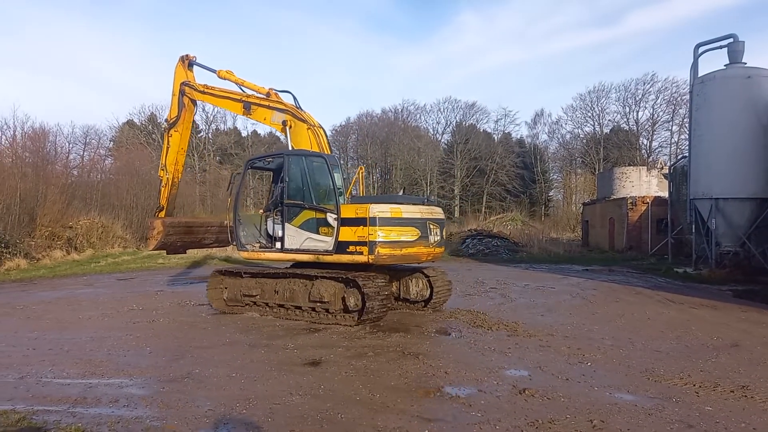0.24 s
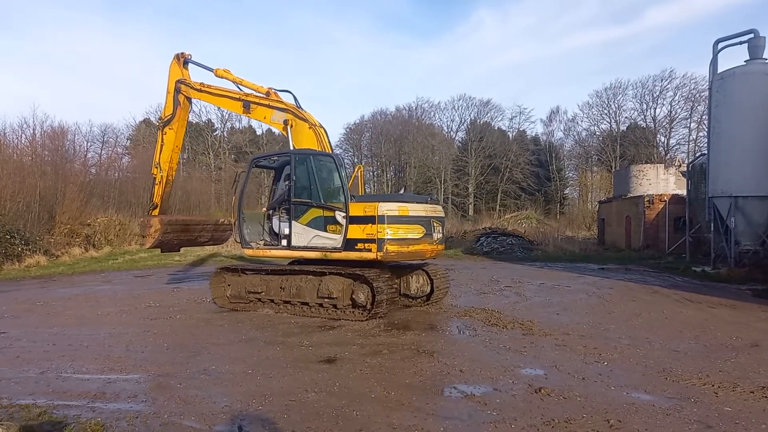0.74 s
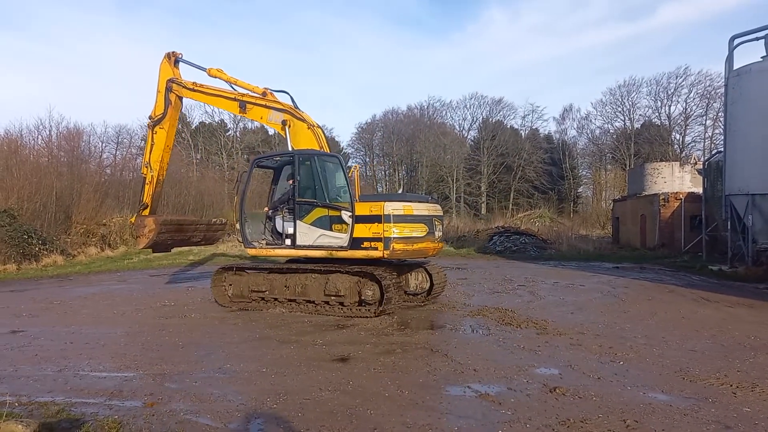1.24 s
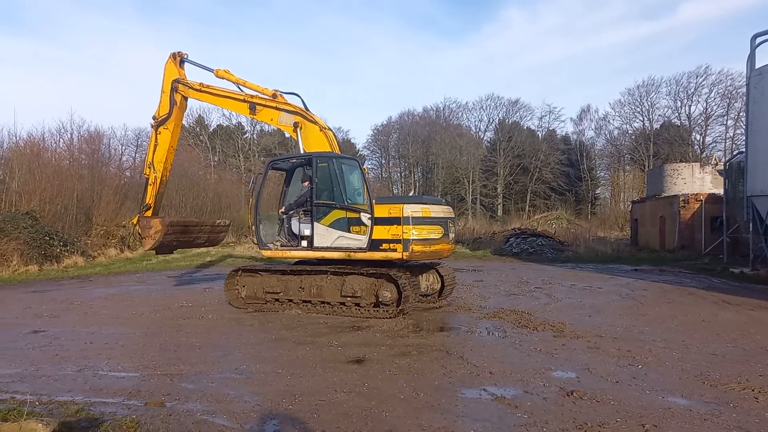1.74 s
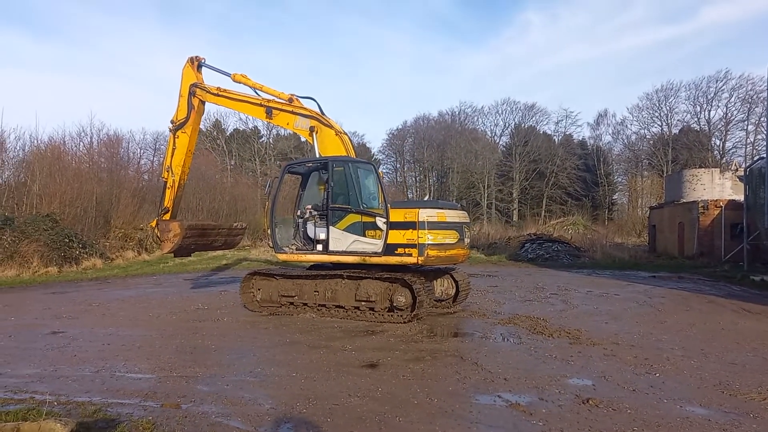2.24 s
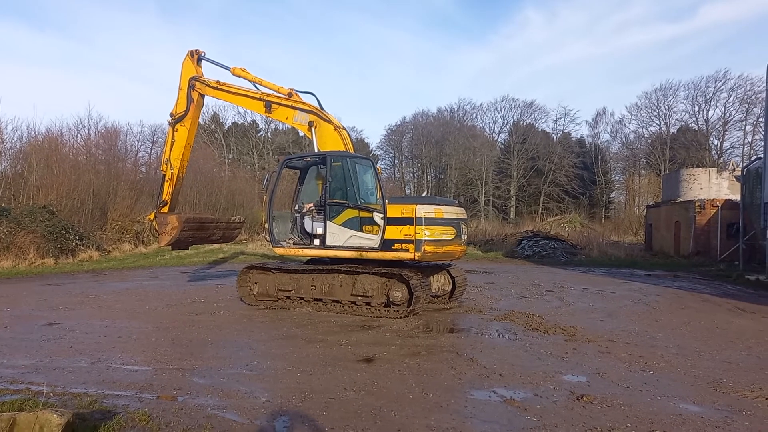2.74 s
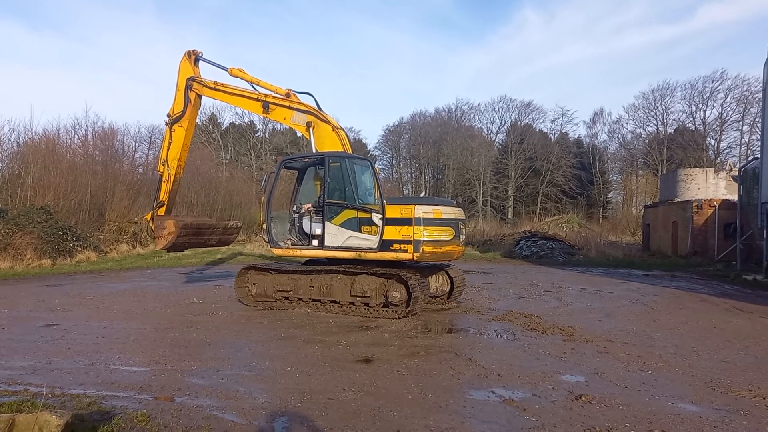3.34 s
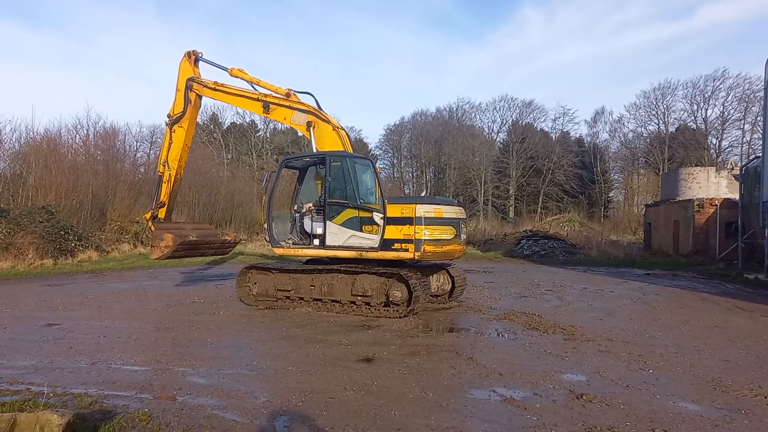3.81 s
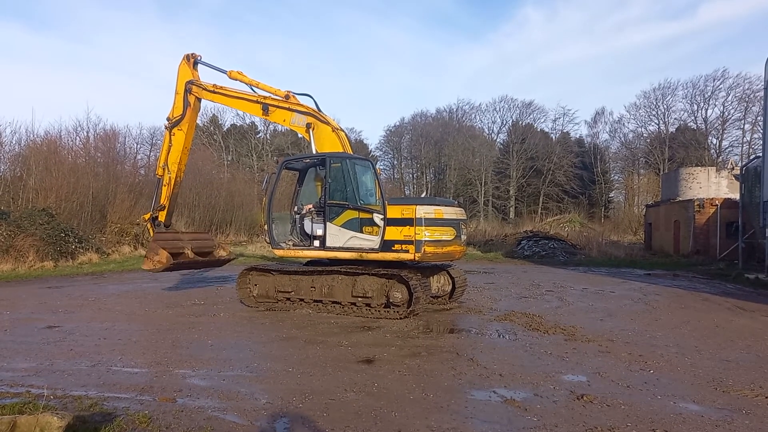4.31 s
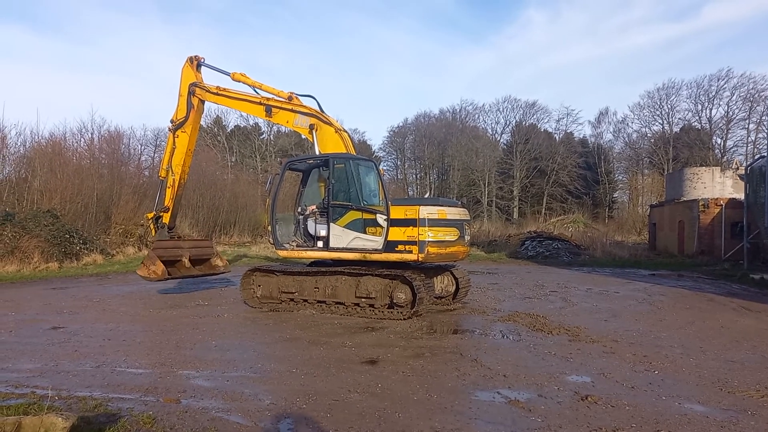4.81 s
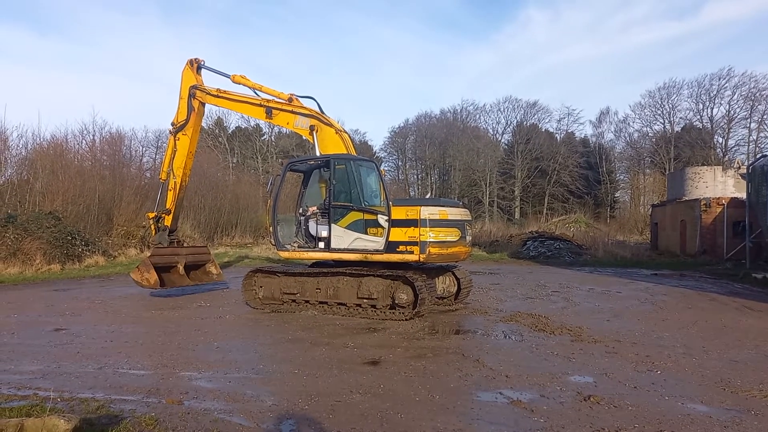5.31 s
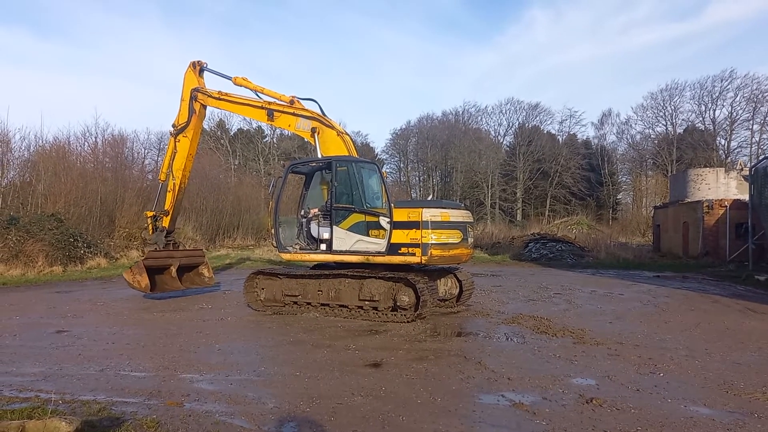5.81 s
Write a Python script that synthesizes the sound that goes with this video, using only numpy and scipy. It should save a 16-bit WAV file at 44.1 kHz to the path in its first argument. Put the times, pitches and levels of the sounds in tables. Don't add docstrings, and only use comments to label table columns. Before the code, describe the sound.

Heavy track links clatter irregularly over a low, rattling diesel drone, with squelchy spits of mud. The clatter slows and ends after about two seconds, leaving steady engine knock with a few soft thumps and metallic ticks. Midway the engine labours harder, pumps whine, and the boom groans briefly; near the end oil whistles softly in a valve. Open yard, moderate distance, compact stereo microphones.

```python
import sys
import numpy as np
from scipy import signal
from scipy.fft import rfft, irfft
from scipy.io import wavfile
from scipy.ndimage import uniform_filter1d

SR = 44100
rng = np.random.default_rng(int(sys.argv[2]) if len(sys.argv) > 2 else 0)


def transcribe(u):
    v = np.clip(np.atleast_2d(u).T, -1, 1)
    q = np.round(v * 32767).astype(np.int16)
    wavfile.write(sys.argv[1], SR, q)


def decibels_to_gain(level_db):
    exponent = np.asarray(level_db, float) / 20
    return 10 ** exponent


N = 267246
T = np.arange(N) / SR
HZ = np.arange(N // 2 + 1) * SR / N
PUMP_RAMP_S, PUMPS_EASE_S = 0.2, 5.15
STRAIN_S, STRAIN_LENGTH_S = 3.4, 0.2

# (time [s], firing rate [Hz])
FIRING_RATE = [(0.0, 68.65), (1.0, 68.35), (1.2, 68.85), (1.4, 71.2), (1.6, 72.5), (1.8, 73.4), (2.0, 73.6),
               (3.0, 73.45), (3.2, 72.3), (3.6, 70.8), (3.8, 70.4), (4.8, 70.4), (5.2, 70.05), (5.4, 69.3),
               (5.8, 69.9), (6.06, 70.05)]


def crankshaft():
    return np.cumsum(columns(FIRING_RATE)[0]) / SR


# (time [s], level [dB])
FIRING_TONE = [(0.0, -23), (1.0, -21.5), (1.24, -22), (1.53, -32), (1.66, -28.5), (1.78, -30.5),
               (1.95, -32.5), (2.45, -33.5), (3.05, -28.5), (3.3, -24.5), (3.44, -23), (3.6, -22.5),
               (3.71, -19), (3.81, -23), (5.2, -23), (5.45, -20), (5.75, -22), (6.06, -22.5)]


def firing_db():
    return columns(FIRING_TONE)[0]


def drone(fired):
    firing = tone(fired, firing_db(), wobble_db=0.5, wobble=0.084)
    return firing + exhaust_overtone(fired) + pump_whine(fired) + shaft_tones(fired)


# (time [s], change [dB], length [s])
FALTERS = [(.3, -7, 0.085), (.88, -8, 0.077), (1.3, -2, .08), (1.494, -8, 0.09), (1.83, -31, 0.065),
           (2.155, -9.5, 0.07), (2.377, -8.5, 0.1), (3.383, 2.5, 0.03), (3.72, -2, 0.058),
           (3.925, -5, 0.07), (4.968, 0.5, 0.03), (5.262, 5.5, 0.054), (5.44, -4, 0.067),
           (5.538, 4.5, 0.091), (5.825, 6, 0.031)]


def exhaust_overtone(fired):
    takes_load, eased = ramp(3.08, PUMP_RAMP_S), ramp(PUMPS_EASE_S, PUMP_RAMP_S)
    db = follow(free_db=-34, load_db=0, rolling_db=1.7) + 2.5 * np.sin(2 * np.pi * fired / 8)
    db = db + 2.5 * takes_load + 0.6 * eased
    db = db + sum(change_db * bump(s, length_s) for s, change_db, length_s in FALTERS)
    lag_turns = -0.27 + 0.14 * np.maximum(takes_load, rolling()) + 0.06 * eased
    return tone(2 * fired + lag_turns, db, wobble_db=1.7, wobble=0.3)


# (multiple of firing rate, idle level [dB], work starts [s], working [dB], eased [dB])
WHINE = [(4.5, -56, 3.1, -42, -49), (7, -47, 3.0, -46, -51), (8, -39.5, 3.4, -42, -48),
         (9, -55, 3.5, -41.5, -46)]


def pump_whine(fired):
    out = 0
    eased = ramp(PUMPS_EASE_S, PUMP_RAMP_S)
    for order, idle_db, start_s, work_db, eased_db in WHINE:
        db = idle_db + (work_db - idle_db) * ramp(start_s, PUMP_RAMP_S) + (eased_db - work_db) * eased
        db = db - 12 * rolling()
        if order == 7:
            db = db + 5.5 * bump(STRAIN_S, STRAIN_LENGTH_S)
        if order > 5:
            db = db - 8 * bump(3.69, 0.05)
        out = out + tone(order * fired + 0.16, db + 1.5, wobble_db=0.6, wobble=0.05)
    return out


# (multiple of shaft speed, level below the firing tone [dB])
SHAFT = [(3, -23.5), (5, -46), (6, -13.5), (7, -25), (8, -21), (10, -29.5), (12, -56), (19, -27.5),
         (20, -23.5)]


def shaft_tones(fired):
    body_db = 0.5 * firing_db() - 12 - 5 * rolling() - 2 * ramp(5.47, PUMP_RAMP_S)
    out = 0
    for order, db in SHAFT:
        turns = order * fired / 2 + 0.04 * rng.random() + 0.16
        out = out + tone(turns, db + body_db, wobble_db=1.5, wobble=0.3)
    return out


def knock(fired):
    count = fired.astype(int)
    cylinder_db = np.array([1.5, -0.8, 0.4, -1.2])[count % 4]
    size = decibels_to_gain(1.6 * rng.standard_normal(count[-1] + 1)[count] + cylinder_db)
    blow = size * np.exp(-((fired + 0.3) % 1) / 0.16)
    jolt_db = slaps()[2] + 1.1 * bump(STRAIN_S, 2 * STRAIN_LENGTH_S)
    lope_db = 0.5 * np.sin(2 * np.pi * fired / 4)
    flutter = decibels_to_gain(1.1 * walk(17) + 0.8 * walk(30) + lope_db)
    rattle = block(blow) + decibels_to_gain(-9) * casing(fired, size, blow)
    rattle_db = follow(free_db=-37, load_db=2.75, rolling_db=3.8) + jolt_db + 0.62
    bright = flutter * (valve_gear(blow) + injector_hiss(blow))
    return decibels_to_gain(rattle_db) * flutter ** 0.25 * rattle + decibels_to_gain(0.46 * jolt_db) * bright + gas_rush(blow)


# (frequency [Hz], level [dB per Hz])
BLOCK = [(440, -26), (750, -4.5), (801, -8), (944, 0), (1020, -4), (1080, 2), (1170, -0.5), (1290, -1),
         (1510, 0), (1900, -5), (2220, -5.5), (2810, -8), (3330, -25), (3600, -16.5), (4680, -22),
         (7920, -120)]


def block(blow):
    return colour((9.5 + blow) * rng.standard_normal(N), BLOCK) * decibels_to_gain(0.6 * walk(7))


# (frequency [Hz], width [Hz], level [dB])
CASING = [(1076, 57, -13.5), (1258, 27, -1.5), (1332, 14, -7), (1506, 27, -5.5), (1689, 48, -4),
          (2198, 92, -11), (2717, 85, -14.5)]


def casing(fired, size, blow):
    strikes = rfft(rng.standard_normal(300))
    one_firing = level(irfft(strikes / np.abs(strikes)), 0)
    pattern = np.interp((fired + 0.028 * walk(7)) % 1, np.linspace(0, 1, 300), one_firing)
    return ring(pattern * size + 0.4 * blow * rng.standard_normal(N), CASING, 3 * walk(11))


# (frequency [Hz], level [dB per Hz])
TREBLE = [(1760, -12), (3000, -2), (3320, 3.5), (3410, 1), (4080, -2.5), (4310, 0), (4910, 1.5), (5260, 1),
          (5680, -6), (6170, -5.5), (6550, -14), (7450, -7), (9000, -21), (11700, -47), (19800, -120)]


def valve_gear(blow):
    db = follow(free_db=-47.5, load_db=3.25, rolling_db=4) + 2
    return decibels_to_gain(db) * colour((1.6 + blow) * rng.standard_normal(N), TREBLE)


# (frequency [Hz], level [dB per Hz])
HISS = [(5000, -10), (8500, -2), (9080, -9), (10000, 3.5), (11100, 0), (12300, 2.5), (13600, -13),
        (14900, -9), (15600, -4)]


def injector_hiss(blow):
    sizzle = (0.32 + blow) * rng.standard_normal(N) + 0.26 * grains(300, 1.5, 0.0027)
    db = follow(free_db=-62, load_db=8.3, rolling_db=7.1) - 0.5
    return decibels_to_gain(db) * colour(sizzle, HISS) * decibels_to_gain(1.1 * walk(8.1))


# (frequency [Hz], level [dB per Hz])
RUSH = [(25, -44), (50, -14.5), (62, -11), (100, -7), (145, -9), (220, -9), (300, -12.5), (390, -17),
        (500, -13.5), (640, -11), (760, -15.5), (830, -23), (1100, -44)]


def gas_rush(blow):
    db = follow(free_db=-36.5, load_db=2.42, rolling_db=5.76) + 1
    return decibels_to_gain(db) * colour((3.9 + blow) * rng.standard_normal(N), RUSH)


# (frequency [Hz], width [Hz], level [dB])
FRAME = [(243, 31, -0.5), (259.8, 21, 0), (293.5, 64, 0), (120, 190, -12)]
# (frequency [Hz], width [Hz], level [dB])
LINKS = [(529, 77, 2), (608, 50, 3.5), (786, 93, -1), (871, 183, 0.5), (1540, 190, -4.5), (2142, 38, -5.5)]


def tracks():
    rumble_db, grind_db, _ = slaps()
    rumble = decibels_to_gain(-30.5 + 0.42 * rumble_db) * ring(grains(500, 1.4, 0.005), FRAME)
    grind = decibels_to_gain(-27.5 + 0.42 * grind_db) * ring(grains(800, 1.7, 0.0025), LINKS)
    return rumble * (1 - ramp(1.689, 0.128)) + grind * (1 - ramp(1.516, 0.256))


# (time [s], lift of rumble [dB], of grinding [dB], of block rattle [dB])
SLAPS = [(.01, 28, 7, 1), (.13, 12, -6, 2.5), (.32, 8, 13.5, -2), (.375, 4, 12, -0.5), (.435, 17, 10, -0.5),
         (.69, 1, 9, 0.5), (.77, 7, 7, -1.5), (.85, 10, -17, 1), (.99, 14, 12.5, -3), (1.085, 6, 11, -2),
         (1.15, 14.5, -5, -1.5), (1.24, 17, -3, 1.5), (1.33, 11, -2, 2.5), (1.405, -1, 2, -1.5),
         (1.442, 12, -1, 0), (1.59, 7, 7, -1.5), (1.655, 18, -6, 3), (1.72, 13, 23, -3.5)]


def slaps():
    s, *lift_db = np.transpose(SLAPS)
    return np.array(lift_db) @ bump(s[:, None], 0.034)


# (time [s], peak level [dB], ringing [Hz])
FRAME_BLOWS = [(0.057, -21, 253), (0.122, -12, 303), (0.15, -17, 253), (0.189, -12, 253),
               (0.225, -11.5, 229), (0.26, -15, 290), (0.294, -17, 233), (0.366, -10, 255),
               (0.427, -8.5, 308), (0.629, -18, 303), (0.709, -9, 287), (0.747, -13, 285),
               (0.864, -18, 237), (0.977, -26, 317), (1.052, -10.5, 278), (1.147, -16, 249),
               (1.174, -17, 247), (1.232, -11.5, 237), (1.329, -15, 290), (1.389, -10.5, 353),
               (1.431, -16, 254), (1.475, -19, 313), (1.632, -16, 269), (1.712, -21, 237)]
# (time [s], peak level [dB], ringing [Hz])
PLATE_BLOWS = [(0.021, -28, 510), (0.072, -20, 707), (0.121, -19, 607), (0.306, -10, 939),
               (0.359, -20, 740), (0.444, -10.5, 618), (0.47, -21, 765), (0.558, -12, 930),
               (0.724, -21, 802), (0.763, -13, 652), (0.829, -10, 897), (0.962, -21, 890),
               (1.082, -21, 785), (1.124, -20, 620), (1.269, -13, 704), (1.307, -12, 740),
               (1.355, -17, 707), (1.377, -10, 600), (1.429, -14, 640), (1.484, -15, 607),
               (1.516, -20, 860), (1.626, -12, 507), (1.698, -17, 574), (1.749, -14, 502)]
# (time [s], peak level [dB], ringing [Hz])
PIN_BLOWS = [(0.0157, -20, 1550), (0.0458, -11, 1564), (0.119, -10, 1555), (0.157, -12, 1550),
             (0.2225, -12, 1560), (0.3266, -20, 1680), (0.461, -11, 1290), (0.5372, -19, 1480),
             (0.623, -23, 1540), (0.669, -18, 1370), (0.7332, -17, 1440), (1.055, -22, 1490),
             (1.0786, -14, 1490), (1.1613, -23, 1700), (1.2092, -16, 1540), (1.2844, -16, 1480),
             (1.3079, -11, 1420), (1.428, -13.5, 1720), (1.5938, -12, 1544), (1.6761, -24, 1330)]


def clatter():
    frame = blows(FRAME_BLOWS, db=-11, t60_s=0.21, spread=0.147)
    plates = blows(PLATE_BLOWS, db=-6.5, t60_s=0.095, spread=0.2)
    pins = blows(PIN_BLOWS, db=-8, t60_s=0.071, spread=0.114)
    return frame + plates + pins


def blows(table, db, t60_s, spread):
    out, t = np.zeros(N + SR), T[:SR // 6]
    for s, peak_db, hz in table:
        below, above = rng.random(2)
        modes = np.sin(2 * np.pi * hz * t)
        for ratio in (1 - spread * (0.3 + below), 1 + spread * (0.34 + above)):
            modes = modes + 0.5 * np.sin(2 * np.pi * hz * ratio * t)
        place(out, s, struck(t, peak_db + db, t60_s, 0.0017) * modes)
    return out[:N]


def settling():
    out, t = np.zeros(N + SR), T[:SR // 5]
    pin_ticks(out, t)
    link_thumps(out, t)
    mud_spits(out, t)
    crack = rng.standard_normal(len(t)) * struck(t, -27, t60_s=0.016, attack_s=0.0006)
    place(out, 1.3795, signal.sosfilt(signal.butter(2, 4200, "high", fs=SR, output="sos"), crack))
    clank = struck(t, -9, t60_s=0.028, attack_s=0.002) * np.sin(2 * np.pi * 500 * t)
    place(out, 1.4293, clank)
    return out[:N]


# (time [s], peak level [dB], mid band relative to it [dB], bright band centre [Hz])
TICKS = [(.1431, -38, 4, 9000), (.5851, -32, 4, 9000), (1.3189, -37, 6, 9500), (1.3895, -40, 14, 6000),
         (1.429, -45, 18, 7000), (1.4894, -41, 14, 8000), (1.5714, -37, 0, 11500), (1.578, -34, 0, 11500),
         (1.585, -36, 2, 11500), (1.5944, -34, 6, 9500), (1.604, -32, 19, 8000), (1.8873, -39, 3, 11200),
         (1.9195, -38, 4, 10400), (2.0408, -38, 10, 7800), (2.0574, -40, 2, 10940), (2.2877, -42, 4, 9000),
         (2.3294, -46, 11, 9000), (2.6494, -52, 10, 9000), (3.698, -38, 8, 10000), (3.8556, -39, 12, 9500),
         (5.821, -40, 22, 7000), (5.829, -40, 22, 7000), (5.838, -43, 8, 10600)]


def pin_ticks(out, t):
    for s, db, mid_db, hz in TICKS:
        burst = rng.standard_normal(len(t)) * struck(t, db + 0.5, t60_s=0.026, attack_s=0.00097)
        place(out, s, band(burst, hz / 1.45, hz * 1.35) + decibels_to_gain(mid_db - 7) * band(burst, 1400, 5000))


# (time [s], peak level [dB], pitch [Hz])
THUMPS = [(1.428, -15.5, 2040), (1.75, -21, 490), (1.817, -13, 481), (1.902, -23, 150), (1.938, -17, 300),
          (2.308, -15.5, 300), (2.976, -20, 183), (3.039, -13, 285), (3.199, -19, 300), (3.31, -17, 200),
          (3.534, -18, 202), (5.398, -20, 216)]


def link_thumps(out, t):
    for s, db, hz in THUMPS:
        modes = sum(np.sin(2 * np.pi * hz * ratio * t) for ratio in (0.75, 0.88, 1.01, 1.15))
        place(out, s, struck(t, db - 6.5, t60_s=0.055, attack_s=0.005) * modes)


# (time [s], peak level [dB], pitch [Hz])
SPITS = [(.1, -34, 14300), (.143, -32, 7400), (.245, -28, 7600), (.26, -32, 7600), (.585, -34, 7600),
         (.61, -34, 7600), (.72, -38, 14900), (.94, -36, 15100), (.965, -36, 15100), (1.015, -35, 14900),
         (1.222, -36, 14900), (1.32, -36, 14300), (1.49, -35, 15100), (1.495, -30, 7600)]


def mud_spits(out, t):
    for s, db, hz in SPITS:
        burst = rng.standard_normal(len(t)) * struck(t, db, t60_s=0.08, attack_s=0.003)
        place(out, s, band(burst, hz / 1.05, hz * 1.05))


# (centre time [s], length [s], level [dB])
GROANS = [
    (3.395, .2, -38),
    (4.15, 0.08, -35),
]


def groan():
    return swells(GROANS) * ring(rng.standard_normal(N), [(182, 40, 0)])


# (centre time [s], length [s], level [dB])
VALVE = [
    (3.72, 0.23, -47),
    (5.42, .15, -44),
    (5.72, 0.21, -44),
]


def valve():
    return swells(VALVE) * ring(rng.standard_normal(N), [(2196, 41, 0)])


# (time [s], pitch [Hz], level [dB])
TURBO = [(1.9, 15600, -85), (2.15, 15050, -69), (2.6, 14750, -69), (3.0, 14450, -67), (3.3, 14700, -67),
         (3.6, 15200, -65), (3.8, 15600, -68), (4.0, 15700, -90)]


def turbo():
    hz, db = columns(TURBO)
    breath = level(uniform_filter1d(uniform_filter1d(rng.standard_normal(N), size=90), size=90), 0)
    return decibels_to_gain(db - 0.3) * breath * np.sqrt(2) * np.sin(2 * np.pi * np.cumsum(hz) / SR)


# (frequency [Hz], likeness [0-1])
ALIKE = [(80, .9997), (150, .985), (300, .93), (520, .965), (750, .9), (950, .76), (1900, .74), (2600, .6),
         (2950, .22), (4200, .45), (5000, .78), (6200, .28), (7700, .45), (9800, .3), (11500, .45),
         (13600, .15), (15300, .5)]
# (frequency [Hz], left leads [radians])
LEAD = [(20, .19), (120, .19), (500, -.1), (2240, -.35), (2900, -1.2), (3300, -2.7), (4000, -1.7),
        (4650, -.2), (6000, .3), (6400, -2.6), (7750, -.3), (8800, -.3), (10500, -2.3), (13600, -2.3),
        (15500, -1.8)]
# (frequency [Hz], left minus right [dB])
LEAN = [(60, 0), (800, 0.3), (1200, 1.5), (2600, 2), (4300, -6), (5700, -1.5), (6400, 5.5), (7300, -2.5),
        (10200, 5), (11900, -2), (13300, 1), (14650, -1), (15700, .8)]


def yard(machine):
    direct = rfft(machine)
    echoes = rfft(rng.standard_normal(N) * np.exp(-T / 0.12))
    scattered = direct * echoes / np.abs(echoes)
    alike = along(ALIKE)
    mid = np.sqrt((1 + alike) / 2) * direct
    side = np.sqrt((1 - alike) / 2) * scattered
    port = decibels_to_gain(along(LEAN) / 2) * np.exp(0.5j * along(LEAD))
    return np.array([irfft((mid + side) * port, N), irfft((mid - side) / port, N)])


def rolling():
    return 1 - ramp(1.36, 0.55)


def follow(free_db, load_db, rolling_db):
    load = np.clip((firing_db() + 33) / 6, 0, 1)
    return free_db + load_db * np.maximum(load, rolling()) + rolling_db * rolling()


def tone(turns, db, wobble_db, wobble):
    return np.sqrt(2) * decibels_to_gain(db + wobble_db * walk(14)) * np.sin(2 * np.pi * turns + wobble * walk(8.4))


def grains(rate, spread_db, smear_s):
    hits = (rng.random(N) < rate / SR) * decibels_to_gain(spread_db * rng.exponential(size=N))
    power = signal.lfilter([1], [1, -np.exp(-1 / (smear_s * SR))], hits ** 2)
    return np.sqrt(power + 1e-9) * rng.standard_normal(N)


def ring(x, modes, swell_db=0):
    out = 0
    for k, (hz, width, db) in enumerate(modes):
        b, a = signal.iirpeak(hz, hz / (1.66 * width), SR)
        rung = signal.lfilter(b, a, signal.lfilter(b, a, x))
        out = out + decibels_to_gain(db + np.roll(swell_db, k * N // len(modes))) * rung
    return level(out, 0)


def struck(t, db, t60_s, attack_s):
    return decibels_to_gain(db - 60 * t / t60_s) * np.minimum(t / attack_s, 1)


def place(out, s, sound):
    out[int(s * SR):][:len(sound)] += sound


def band(x, low_hz, high_hz):
    return signal.sosfilt(signal.butter(2, [low_hz, high_hz], "band", fs=SR, output="sos"), x)


def swells(table):
    return sum(decibels_to_gain(db) * bump(s, length_s) for s, length_s, db in table)


def bump(s, length_s):
    return np.exp(-((T - s) / length_s) ** 2)


def ramp(start_s, length_s):
    return np.clip((T - start_s) / length_s, 0, 1)


def walk(rate):
    k = int(SR / rate)
    held = np.repeat(rng.standard_normal(N // k + 1), k)
    return uniform_filter1d(uniform_filter1d(held, k), k)[:N]


def level(x, db):
    return x * decibels_to_gain(db) / np.sqrt(np.mean(x ** 2))


def colour(x, spectrum):
    return level(irfft(rfft(x) * decibels_to_gain(along(spectrum)), N), 0)


def columns(table):
    s, *rest = np.transpose(table)
    return [np.interp(T, s, c) for c in rest]


def along(table):
    hz, value = np.transpose(table)
    return np.interp(np.log(HZ + 1), np.log(hz + 1), value)


def scene():
    fired = crankshaft()
    machine = drone(fired) + knock(fired) + tracks() + clatter() + valve()
    return yard(machine) + settling() + groan() + turbo()


def band_limit(x):
    return signal.sosfilt(signal.butter(12, 15860, fs=SR, output="sos"), x)


def record(dry):
    return band_limit(dry)


dry = scene()
out = record(dry)
transcribe(out)
```